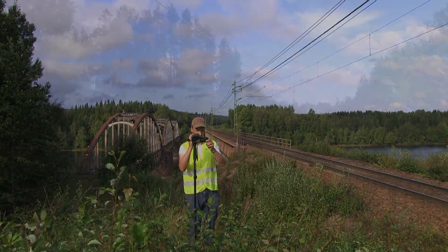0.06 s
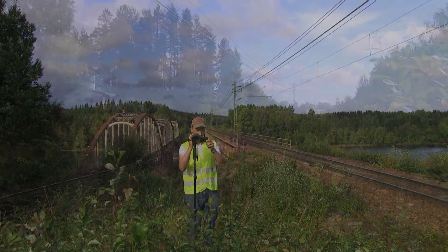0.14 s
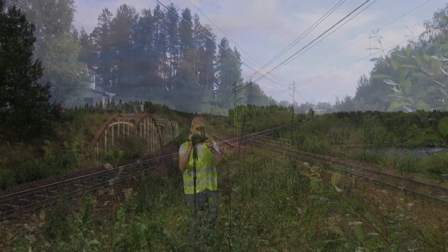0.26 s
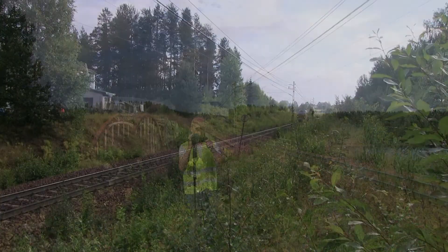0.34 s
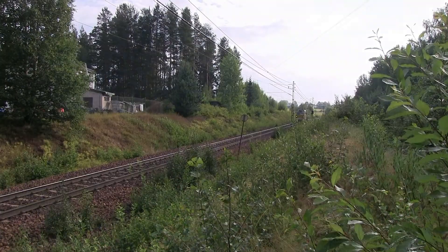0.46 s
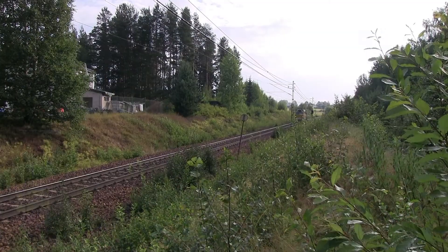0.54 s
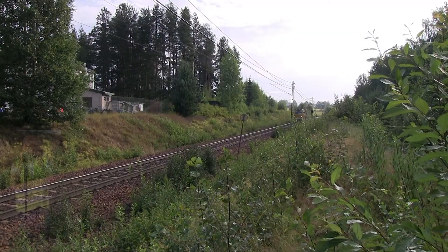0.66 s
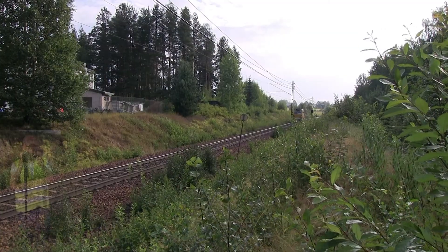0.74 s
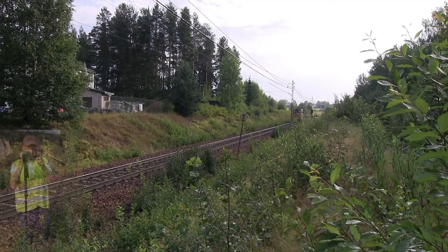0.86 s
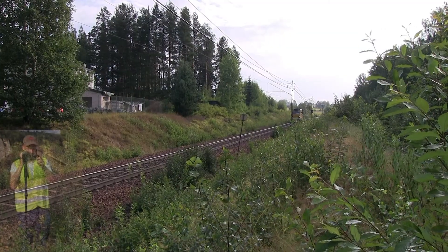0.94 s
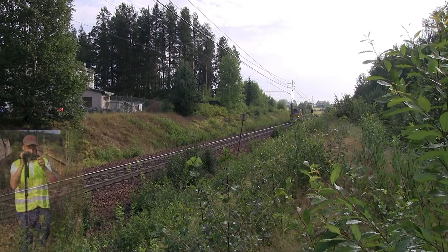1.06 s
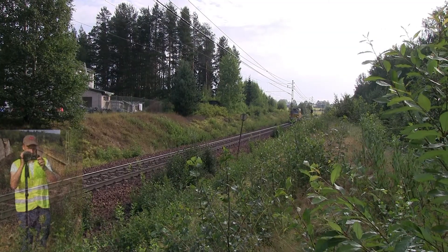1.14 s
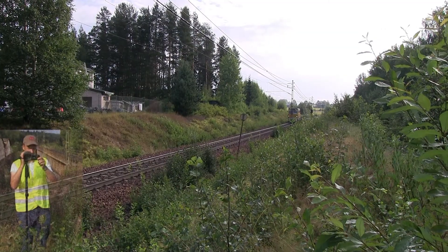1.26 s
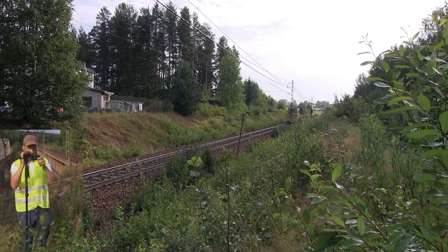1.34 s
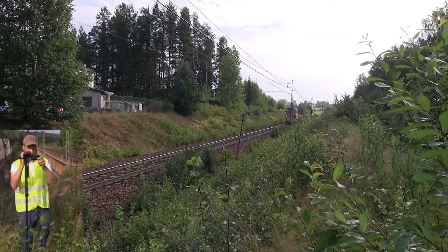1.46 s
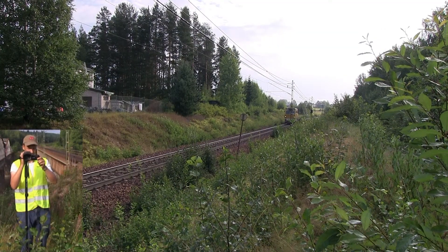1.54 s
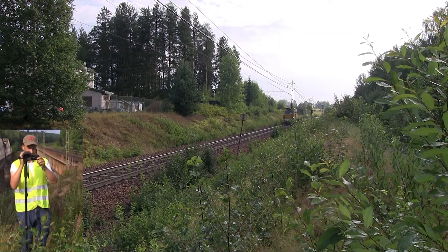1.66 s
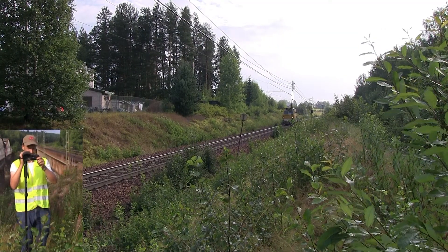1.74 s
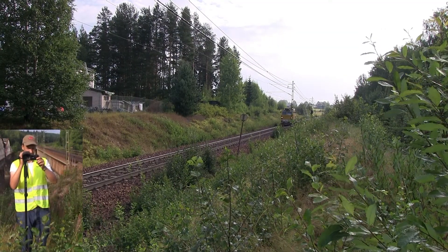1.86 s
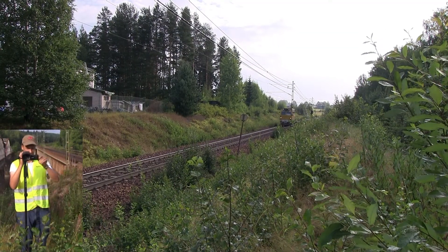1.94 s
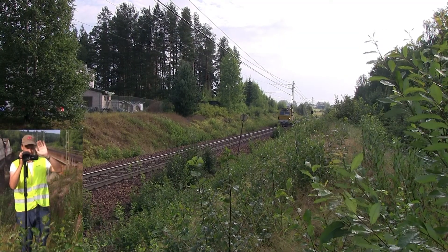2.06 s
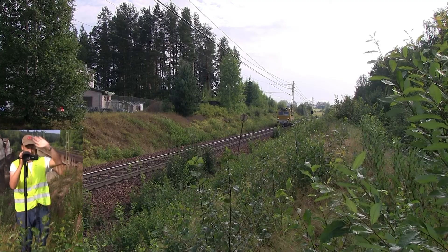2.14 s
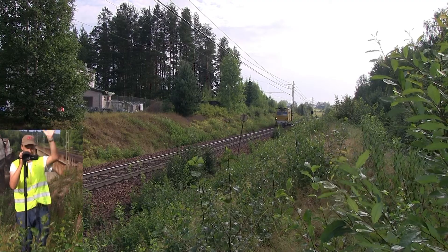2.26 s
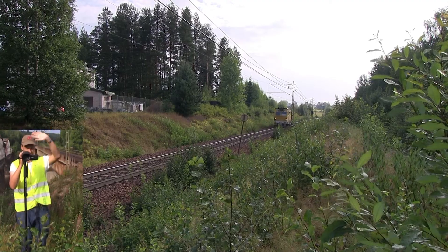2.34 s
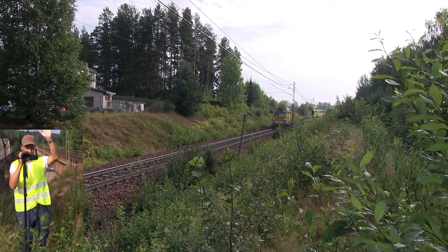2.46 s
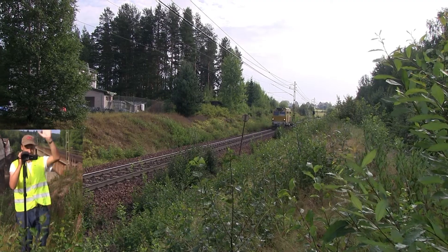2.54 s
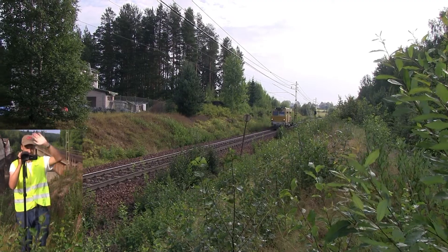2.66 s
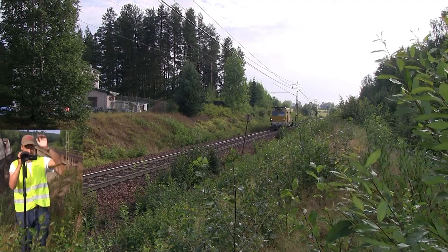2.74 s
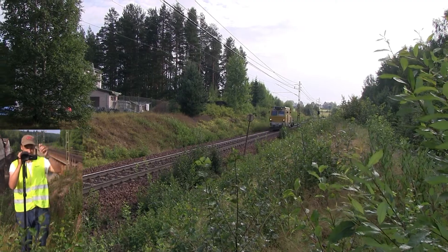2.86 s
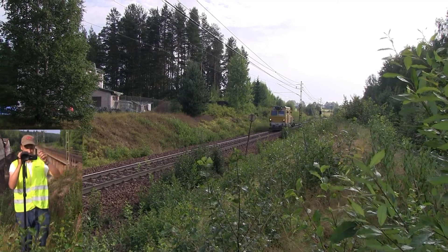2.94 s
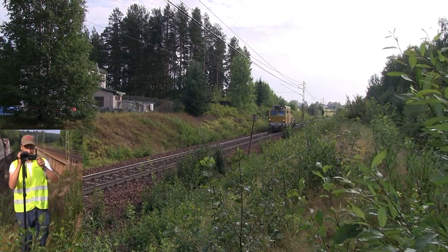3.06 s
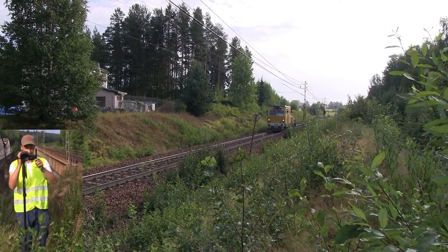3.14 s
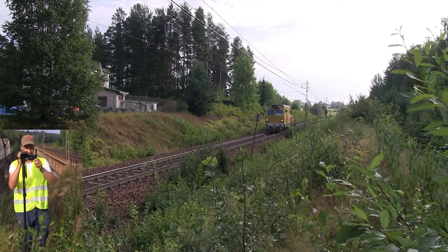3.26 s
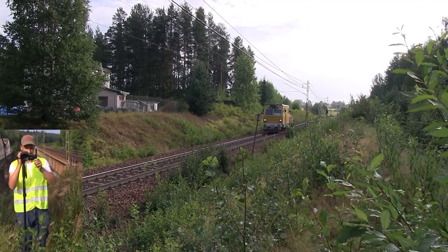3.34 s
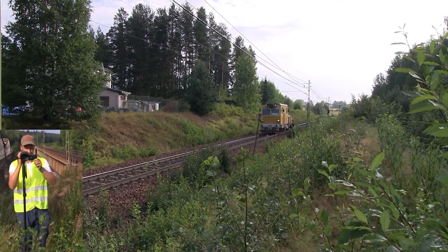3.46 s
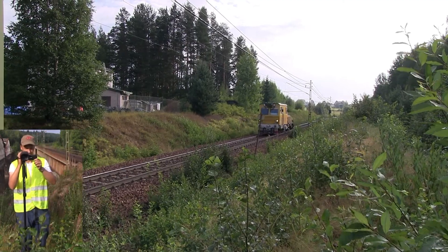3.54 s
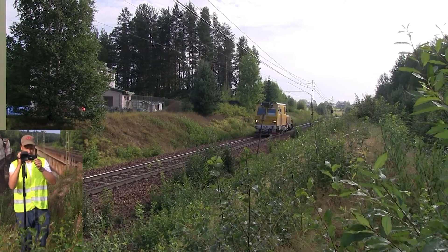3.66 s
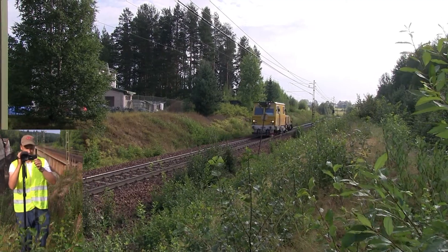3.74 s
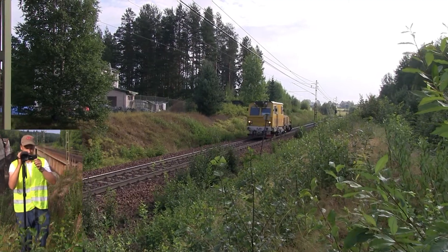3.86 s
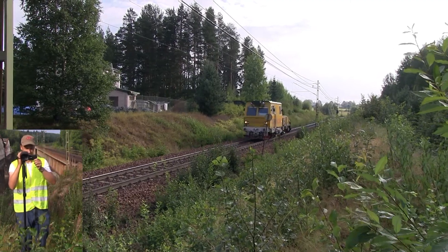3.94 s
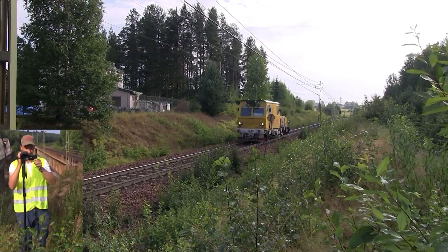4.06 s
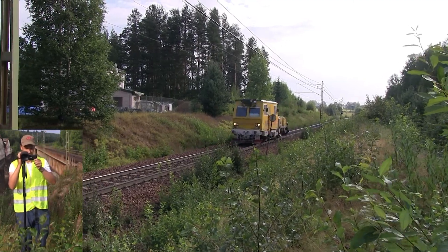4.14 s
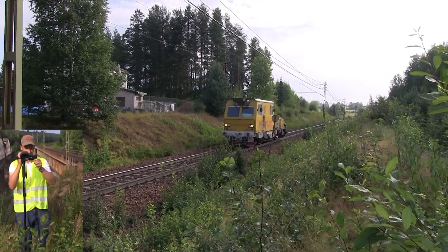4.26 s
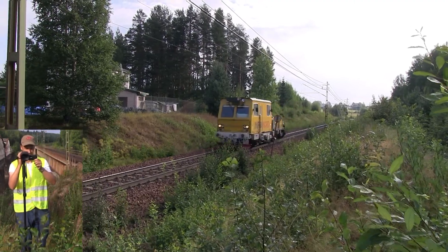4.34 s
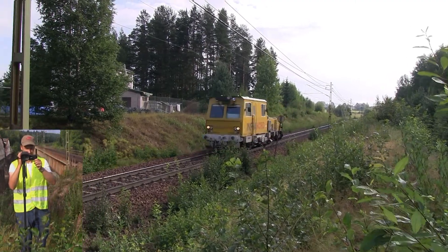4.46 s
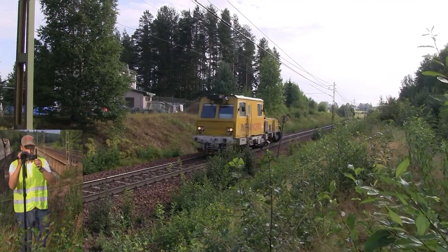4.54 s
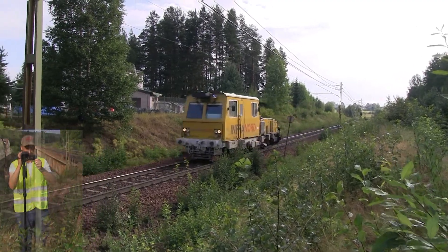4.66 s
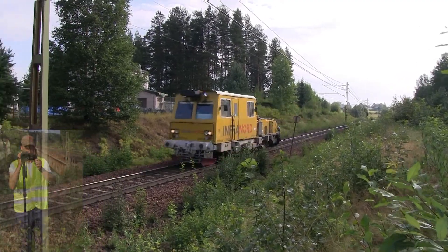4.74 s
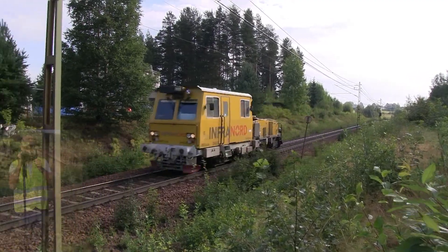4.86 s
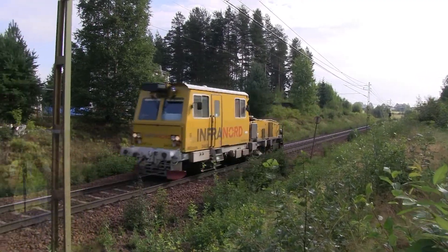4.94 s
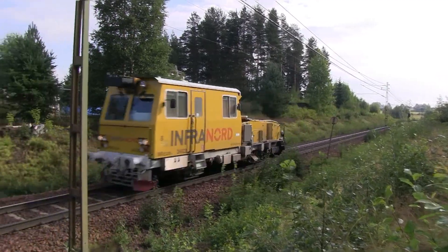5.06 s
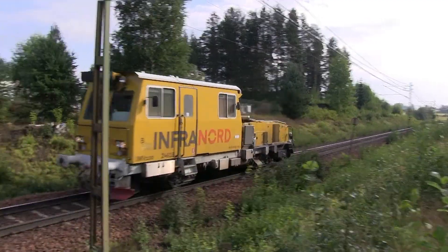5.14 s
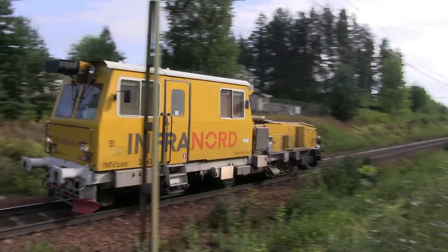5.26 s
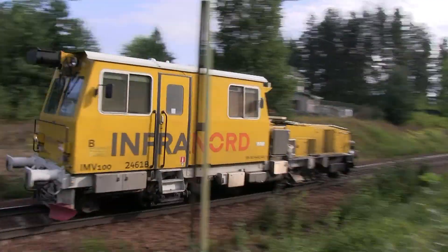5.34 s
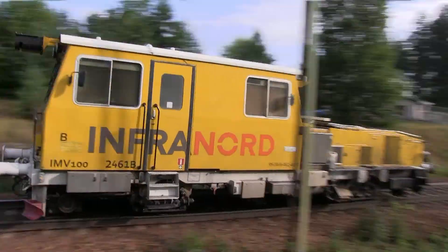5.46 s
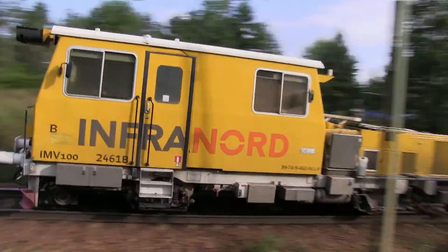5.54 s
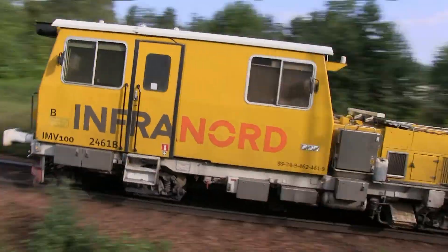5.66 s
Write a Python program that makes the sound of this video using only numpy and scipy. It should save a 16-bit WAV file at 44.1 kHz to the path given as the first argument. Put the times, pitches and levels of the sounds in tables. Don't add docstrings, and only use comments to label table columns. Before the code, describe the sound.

Outdoors by a railway, low throbbing and singing rails build, three brief two-tone horn blasts ring through trees, and a roaring diesel arrives.

```python
import sys
import numpy as np
from scipy import signal
from scipy.fft import rfft, irfft, next_fast_len
from scipy.io import wavfile
from scipy.ndimage import uniform_filter1d, map_coordinates

SR = 44100
rng = np.random.default_rng(int(sys.argv[2]) if len(sys.argv) > 2 else 0)


def materialize(psi):
    bounded = np.clip(np.atleast_2d(psi).T, -1, 1)
    quanta = np.round(bounded * 32767).astype(np.int16)
    wavfile.write(sys.argv[1], SR, quanta)


def boost(x):
    u = np.asarray(x, float) / 20
    return 10 ** u


N = 251370

# [t/s, level/dB]
RAIL_SWELLS = [(0, -36), (.3, -29.5), (.47, -21.5), (.7, -28.5), (1.09, -26), (1.4, -28), (1.71, -26),
               (2.1, -27.5), (2.25, -24.5), (2.95, -28.5), (3.4, -24), (3.94, -25), (4.75, -24), (5.3, -26),
               (5.7, -42)]
# [f/Hz, width/Hz, level/dB]
RAIL_BANDS = [(385, 85, -4), (415.4, 43.4, 5.5), (516.3, 77, 1), (666, 210, -12.5), (752, 187, -7.5),
              (968, 430, -11.5), (1111, 280, -6.5), (1324, 104, -8.5)]
# [f/Hz, level/dB per Hz]
RUMBLE_COLOUR = [(18, -20), (30, -14), (60, -1), (120, 3), (180, 0), (260, 2.5), (330, 9), (500, -89)]
# [f/Hz, level/dB per Hz]
ROAR_COLOUR = [(150, -87), (250, -19.5), (345, -4.5), (382, -3), (636, -4.5), (754, -5), (1260, -12.5),
               (1460, -11), (1680, -14), (2890, -17.5), (3790, -24), (6640, -28.5), (14500, -60)]
# [f/Hz, width/Hz, level/dB]
WHEEL_RINGS = [(1400, 200, -3), (1900, 250, -10), (2930, 220, -6), (4220, 400, -18)]
# [f/Hz, width/Hz, level/dB]
TURBO_BANDS = [(6500, 730, 6), (7580, 670, -3), (9800, 1500, -9.5), (10900, 810, -13.5),
               (11900, 300, -30.5)]
# [f/Hz, level/dB]
TURBO_WHISTLES = [(7650, -77), (9582, -81), (10880, -80), (11784, -78)]
# [t/s, firing f/Hz, firing level/dB]
FIRING = [
    (0, 100.4, -42),
    (.62, 100.4, -35.5),
    (1.2, 100.4, -39),
    (1.85, 100.3, -50),
    (2.7, 99.2, -44),
    (3.9, 98, -33.5),
    (4.55, 97.4, -30),
    (5.15, 96.5, -20.5),
    (5.7, 95.6, -20.5),
]
# [multiple of the cycle rate, level/dB re firing]
CYCLE_ORDERS = [(4, -22), (6, -30), (7, -26), (8, -15), (10, -12)]
# [f/Hz, level/dB per Hz]
HISS_COLOUR = [(1000, -40), (3000, -34), (8000, -3), (12000, 3), (14500, -8)]
# [t/s, length/s, level/dB]
PINION_WHINES = [(1.0, 0.6, -41), (1.68, .22, -36), (2.097, 0.32, -34.5), (2.476, 0.27, -32.5),
                 (2.929, 0.14, -32.5), (3.61, 0.39, -36), (4.31, .07, -30.5), (4.5, 0.113, -30.5),
                 (4.738, 0.56, -29), (5.24, 0.076, -21), (5.5, 0.28, -30)]
# [t/s, length/s, level/dB]
CROWN_WHINES = [
    (1.91, 0.064, -35),
    (2.1, 0.078, -29.5),
    (3.1, 0.39, -37),
    (3.62, 0.45, -39),
    (4.1, .36, -29.5),
    (4.73, .18, -30.5),
    (5.0, 0.061, -25),
    (5.12, 0.18, -31),
]
# [t/s, length/s, level/dB]
LOW_PANEL = [
    (4.83, .05, -34),
    (5.3, .4, -25),
]
HIGH_PANEL = [
    (4.98, .06, -24),
    (5.4, .17, -24),
]
# [t/s, length/s, level/dB]
FLANGE_SQUEAL = [
    (4.53, .06, -28),
    (4.6, .1, -29),
]
# [t/s at 1 kHz, level/dB, spread/s,
# left-right/dB, tilt/dB per # octave]
WHEEL_BLOWS = [
    (2.0646, -5.5, .020, 9, 0),
    (2.0743, -10.5, .020, 9.5, -4.5),
    (3.653, -26, 0.02, 16, 10),
               (4.089, -16, .013, 6, -17),
    (4.072, -13.5, .004, 4, -8),
]
# [f/Hz, level/dB]
BLOW_COLOUR = [(150, -81), (300, -29.5), (420, -4.5), (650, -9.5), (1100, 3.5), (1350, -8), (1550, -39),
               (1900, -22), (2400, -61), (5000, -80)]
# [f/Hz, t60/s]
TREE_DECAY = [(300, 0.91), (2000, 1.0), (5000, 0.78), (9000, 0.54), (13000, 0.46)]
# [f/Hz, level/dB]
TREE_COLOUR = [(150, -50), (380, 1), (800, -1), (1300, 3), (2500, -4), (3300, -3), (4500, 0), (7000, 2),
               (11000, 6)]
# [delay t/s, spread/s, extra gain]
TREE_ANSWERS = [
    (.095, 0.012, 0.31),
    (.28, 0.073, 0.73),
]
# [t/s, length/s, level/dB]
HORN_TOOTS = [
    (2.781, 0.044, -10.5),
    (3.247, 0.054, -11),
    (3.463, 0.057, -10),
]
LOW_HORN_SLIDES = [
    .165,
    .155,
    .085,
]
# [multiple, level/dB]
HIGH_OVERTONES = [(1, -6), (2, -12), (3, -7.5), (4, -2), (5, -10), (6, 3), (7, -3.5), (8, -5), (9, -8),
                  (10, -10), (11, -16), (13, -11), (16, -16), (20, -26)]
LOW_OVERTONES = [(1, -12.5), (2, -0.5), (3, -9), (4, -8), (5, -2.5), (6, -4), (7, -8), (8, -4.5), (9, -6.5),
                 (10, -12), (12, -15.5), (15, -19), (18, -16), (22, -34)]
# [f/Hz, left-right/dB]
FAR_BALANCE = [(60, 6.5), (150, 13), (370, 5.7), (930, 8.1), (2310, 0.73), (5740, 1.5), (14300, 4)]
NEAR_BALANCE = [(40, 2), (60, 7), (150, 7.5), (370, 5.0), (930, 1.5), (2310, 1), (5740, 0.5), (14300, 7.5)]
RUMBLE_BALANCE = [(30, 0), (70, 32), (150, 11), (300, 5)]
HORN_BALANCE = [(370, 5), (680, 3.5), (1260, -3.5), (2310, -3), (4240, -1), (7780, -3.5), (14300, 1)]
# [f/Hz, left-right likeness]
FAR_LIKENESS = [(60, 0.66), (180, 0.67), (540, 0.94), (1600, 0.69), (4790, 1), (14300, 0.66)]
NEAR_LIKENESS = [(60, 1), (180, 0.4), (540, 0.99), (1600, 0.67), (4790, 0.69), (14300, 1)]

TIME = np.arange(N) / SR
PASS_S = 5.528


def unit(x):
    return x / np.sqrt(np.mean(x ** 2) + 1e-20)


def along(points, hz):
    f, v = np.transpose(points)
    return np.interp(np.log(hz + 1), np.log(f + 1), v)


def curves(rows):
    s, *cols = np.transpose(rows)
    return [np.interp(TIME, s, c) for c in cols]


def wobble(rate):
    return map_coordinates(rng.standard_normal(int(N * rate / SR) + 4), [TIME * rate])


def filtered(x, response):
    m = next_fast_len(N + SR // 2)
    return irfft(rfft(x, m) * response(np.fft.rfftfreq(m, 1 / SR)), m)[..., :N]


def resonances(modes, f):
    return np.sqrt(sum(boost(2 * db) / (1 + (2 * (f - c) / w) ** 2) ** 2 for c, w, db in modes))


def placed(x, side):
    return filtered(x * np.ones((2, 1)), lambda f: boost(np.outer([.5, -.5], along(side, f))))


def rush(gain, band_hz, alike, patchy_db):
    z = signal.stft(rng.standard_normal((2, N)), nperseg=512)[2]
    field = uniform_filter1d(rng.standard_normal(z.shape[1:]), size=5, axis=0)
    field = uniform_filter1d(field, size=10, axis=1)
    pair = signal.istft(z * boost(patchy_db * unit(field)), nperseg=512)[1][:, :N]

    def mid_side(f):
        turn = np.arccos(np.clip(along(alike, f), -1, 1)) / 2
        return gain(f) * [np.cos(turn), np.sin(turn)]

    mid, side = filtered(pair, mid_side)
    inside = filtered(mid, lambda f: (f > band_hz[0]) & (f < band_hz[1]))
    return np.array([mid + side, mid - side]) / np.std(inside)


def tone(hz, db, unsteady):
    drift = unsteady * wobble(25)
    level = boost(db + 0.84 * unsteady * wobble(13))
    return np.sqrt(2) * level * np.sin(2 * np.pi * np.cumsum(hz) / SR + drift)


def nearing(close_db, closest_s, slope, lead_s=0):
    away = np.hypot(1, (TIME + lead_s - PASS_S) / closest_s)
    return close_db - slope * 20 * np.log10(away)


def opening():
    return -11.5 * np.exp(-TIME / 0.16)


def bursts(rows, between_db):
    swell_s = 0.074

    def edge(s, length):
        return np.clip(np.minimum(TIME - s, s + length - TIME) / swell_s + .5, 0, 1)

    return boost(between_db) + sum(boost(db) * edge(s, length) for s, length, db in rows)


def rail_hum(hum_db):
    def rail(f):
        return resonances(RAIL_BANDS, f) / np.sqrt(1 + (f / 1390) ** 40)

    return boost(hum_db - 3.5 + 0.95 * wobble(13)) * rush(rail, (300, 1400), FAR_LIKENESS, patchy_db=1.72)


def ground_rumble(hum_db):
    follows_db = 0.98 * (hum_db + 22.5) * np.exp(-TIME / 0.83)
    rumble_db = nearing(-28, 0.56, 1.34) + opening() + follows_db
    noise = rush(lambda f: boost(along(RUMBLE_COLOUR, f)), (110, 290), [(30, 0.65), (120, 0.93)], patchy_db=2.0)
    return boost(rumble_db + 0.28 * wobble(5.8)) * noise


def engine_roar(roar_db):
    knock = boost(0.61 * np.sin(2 * np.pi * np.cumsum(curves(FIRING)[0]) / SR))
    noise = rush(lambda f: boost(along(ROAR_COLOUR, f)), (1600, 5000), NEAR_LIKENESS, patchy_db=0.93)
    return boost(roar_db + .6 * wobble(5.3)) * knock * noise


def ringing_wheels(roar_db):
    ring_db = roar_db - 0.5 + 1.07 * (roar_db + 24.5)
    return boost(ring_db) * rush(lambda f: resonances(WHEEL_RINGS, f), (1300, 5000), NEAR_LIKENESS, patchy_db=2.0)


def turbo():
    hiss_db = nearing(-42.5, 2.49, 2.4, lead_s=0.32) + opening()
    noise = rush(lambda f: resonances(TURBO_BANDS, f), (5800, 7500), FAR_LIKENESS, patchy_db=1.2)
    whistle = sum(tone(np.full(N, hz), db + opening() + 4 * wobble(2.5), unsteady=0.8)
                  for hz, db in TURBO_WHISTLES)
    return boost(hiss_db - 2.5) * noise + whistle


def rolling():
    hum_db, = curves(RAIL_SWELLS)
    roar_db = nearing(-25, .4, 1.154, lead_s=0.065) + opening()
    far = placed(rail_hum(hum_db) + turbo(), FAR_BALANCE)
    near = placed(engine_roar(roar_db) + ringing_wheels(roar_db), NEAR_BALANCE)
    return far + near + placed(ground_rumble(hum_db), RUMBLE_BALANCE)


def main_diesel():
    firing_hz, firing_db = curves(FIRING)
    firing_hz = uniform_filter1d(firing_hz, size=SR // 2, mode="nearest")
    orders = sum(tone(k * firing_hz / 5, firing_db + db + .35 * (firing_db + 23), 0.49)
                 for k, db in CYCLE_ORDERS)
    drive_shaft = tone(firing_hz * 11 / 12, nearing(-30.5, 0.83, 2.08), .08)
    return tone(firing_hz, firing_db, 0.093) + orders + drive_shaft


def generator_set():
    hz = 40.56 - .6 * boost(nearing(0, .5, 1))
    far_db = -45.5 - 12 * np.clip((1.05 - TIME) / .4, 0, 1)
    second_db = 10 * np.log10(boost(2 * nearing(-25.5, 1.13, 3.14)) + boost(2 * far_db))
    shaft = tone(hz, nearing(-34.5, 0.33, 0.66), 0.15)
    overtones = sum(tone(k * hz, second_db + db, 0.11) for k, db in [(3, -13), (4, -19)])
    return shaft + tone(2 * hz, second_db, .08) + overtones


def exhaust():
    return (main_diesel() + generator_set()) * np.clip(0.37 + TIME / 0.58, 0, 1)


def floor():
    noise = rush(lambda f: boost(along(HISS_COLOUR, f)), (8000, 14000), [(1000, 0.65)], patchy_db=0.5)
    return boost(-65.5 - 11 * np.exp(-TIME / 0.34)) * noise


def whine(hz, rows, between_db, unsteady, broken_db):
    gain = bursts(rows, between_db) * boost(broken_db * (wobble(15) - .5))
    return gain * tone(hz + broken_db * wobble(6), 0, unsteady)


def gears():
    pinion = whine(815 - 13.4 * TIME, PINION_WHINES, -49.5, 1.2, broken_db=3)
    crown = whine(707 - 4.1 * TIME, CROWN_WHINES, -49.5, 1.0, broken_db=3)
    squeal = whine(1056, FLANGE_SQUEAL, -90, .5, broken_db=1.5)
    panels = whine(381., LOW_PANEL, -90, .3, broken_db=1) + whine(452., HIGH_PANEL, -90, .18, broken_db=1)
    return boost(opening()) * (panels + pinion + crown + squeal)


def joints():
    out = np.zeros((2, N))
    click = np.eye(1, N)[0]
    for s, db, spread, side_db, tilt_db in WHEEL_BLOWS:
        def blow(f):
            khz = np.maximum(f, 50) / 1000
            cycles = (s - spread) * f + 1000 * spread * np.log(khz)
            colour = boost(along(BLOW_COLOUR, f) + tilt_db * np.log2(np.maximum(khz, .3)))
            return colour * np.exp(-2j * np.pi * cycles)

        chirp = filtered(click, blow)
        out += boost(db + np.array([[.5], [-.5]]) * side_db) * chirp / np.abs(chirp).max()
    return out


def trees(x):
    scatter = rng.standard_normal((2, SR)) + 1.22 * rng.standard_normal(SR)
    hz, t, z = signal.stft(scatter, SR, nperseg=256)
    shape = boost(along(TREE_COLOUR, hz)[:, None] - 60 * t / along(TREE_DECAY, hz)[:, None])
    answers = sum(extra * np.exp(-((t - s) / spread) ** 2) for s, spread, extra in TREE_ANSWERS)
    tail = signal.istft(z * shape * (1 + answers), SR, nperseg=256)[1]
    smeared = x * (.35 + .6 * wobble(500) + .7 * wobble(2500))
    late = np.pad(smeared, (600, 0))[None]
    return signal.fftconvolve(late, tail / np.linalg.norm(tail[0]), axes=1)[:, :N]


def reed(t, length, hz, glide, settle, orders, late_db, jitter):
    loose = np.exp(-(t / settle) ** 2)
    shake = unit(uniform_filter1d(uniform_filter1d(rng.standard_normal(len(t)), size=60), size=60))
    phase = 2 * np.pi * np.cumsum(hz * (1 + glide * loose)) / SR + jitter * shake
    k = np.arange(1, 34)[:, None]
    known, known_db = np.transpose(orders)
    level_db = np.interp(k, known, known_db) - 1.7 * np.maximum(k - known[-1], 0)
    level_db = level_db + rng.normal(0, .8, k.shape)
    level_db = level_db - late_db * loose * np.log2(np.maximum(k / 2, 1))
    flutter = rng.standard_normal((len(k), len(t)))
    for _ in range(2):
        flutter = uniform_filter1d(flutter, size=round(.01 * SR), axis=1)
    level_db = level_db + 1.5 * unit(flutter) * np.clip(k / 6, 0, 1)
    wave = np.sum(boost(level_db) * np.sin(k * phase + rng.uniform(0, 2 * np.pi, k.shape)), axis=0)
    rise = np.sin(np.clip(t / .011, 0, 1) * np.pi / 2) ** 2
    return wave * rise * boost(-60 * np.maximum(t - length, 0) / 0.064)


def valve_air(t, length):
    bands = [(3000, 1500, 11), (6500, 1800, -22)]  # f/Hz, width/Hz, level/dB
    air = filtered(rng.standard_normal(N), lambda f: resonances(bands, f))[:len(t)]
    return unit(air) * np.clip(t / 0.0023, 0, 1) * boost(-60 * np.maximum(t - length, 0) / 0.29)


def horn():
    out, t = np.zeros(N), np.arange(SR // 5) / SR
    for (s, length, db), slide in zip(HORN_TOOTS, LOW_HORN_SLIDES):
        high = reed(t, length - .008, 412, .02, .022, HIGH_OVERTONES, late_db=.6, jitter=.045)
        low = reed(t, length, 386, slide, .018, LOW_OVERTONES, late_db=12, jitter=.06)
        toot = boost(-2.5 - 70 * t) * high + boost(-1.5 - 60 * t) * low + .2 * valve_air(t, length)
        out[round(s * SR):][:len(t)] += boost(db) * toot
    return out


def scene():
    toots, blows = horn(), joints()
    horns = filtered(toots + boost(-4) * trees(toots), lambda f: 1 / np.sqrt(1 + (340 / (f + 1)) ** 12))
    air = placed(exhaust(), NEAR_BALANCE) + placed(gears(), FAR_BALANCE) + placed(horns, HORN_BALANCE)
    return air + rolling() + floor() + blows + boost(-20) * trees(blows[0])


def band_limit(x):
    return signal.sosfilt(signal.butter(12, 14900, fs=SR, output="sos"), x)


def record(dry):
    heard = filtered(dry, lambda f: boost(-18 * np.clip((f - 14250) / 100, 0, 1)))
    bright = filtered(heard.mean(axis=0), lambda f: f > 2000)
    knee_db, share, hold_s = -27.5, 0.14, 0.053
    power = np.abs(uniform_filter1d(bright ** 2, size=round(hold_s * SR)))
    level_db = 10 * np.log10(power + 1e-12)
    heard = heard * boost(-share * np.maximum(level_db - knee_db, 0))
    soft = heard / (1 + np.abs(heard / 1.05) ** 6) ** (1 / 6)
    return band_limit(soft)


dry = scene()
out = record(dry)
materialize(out)
```